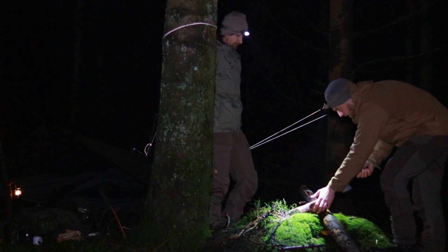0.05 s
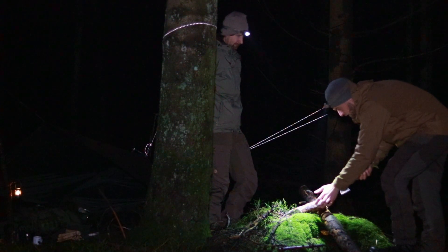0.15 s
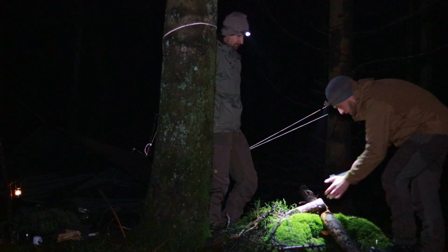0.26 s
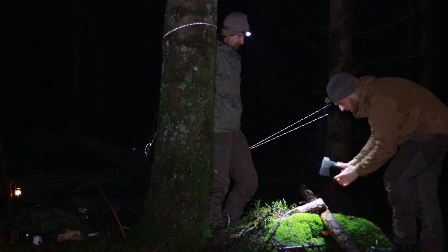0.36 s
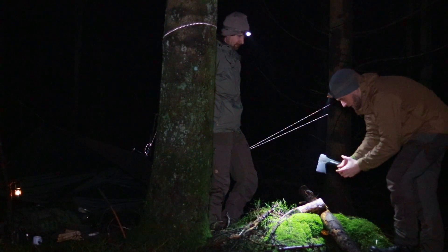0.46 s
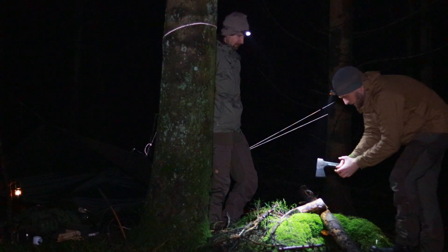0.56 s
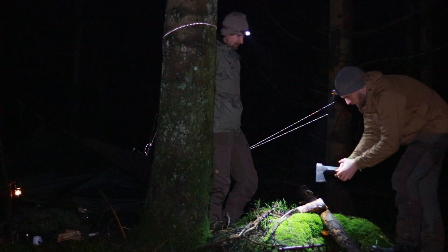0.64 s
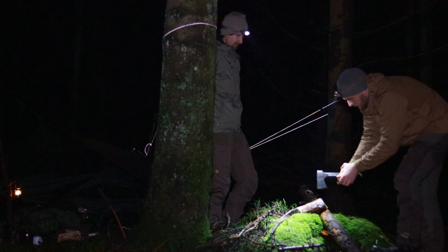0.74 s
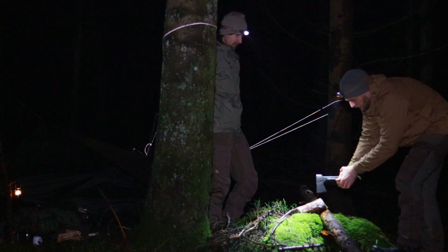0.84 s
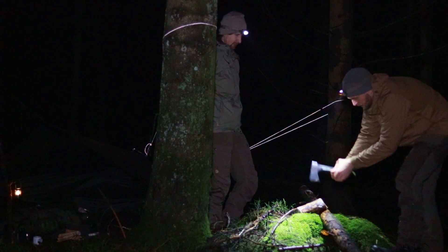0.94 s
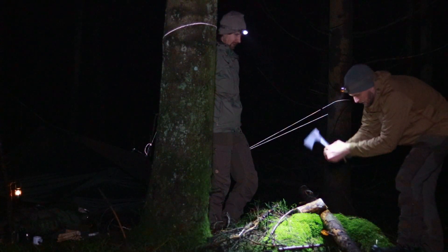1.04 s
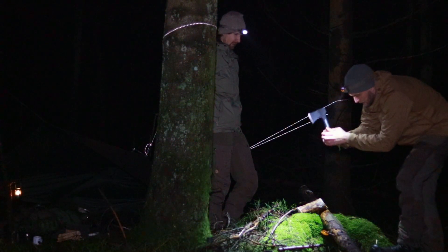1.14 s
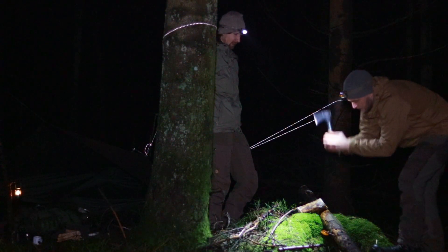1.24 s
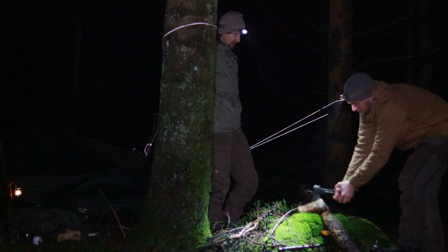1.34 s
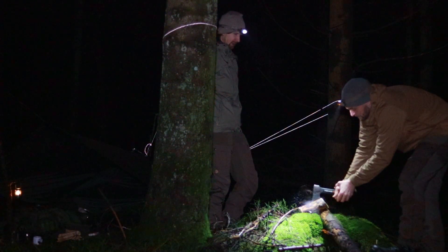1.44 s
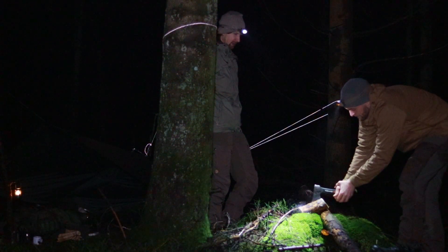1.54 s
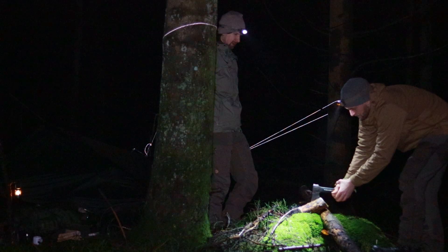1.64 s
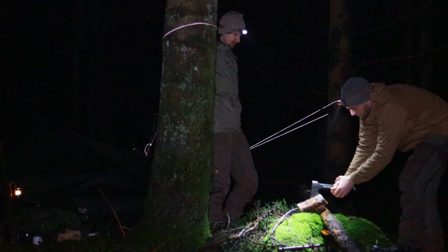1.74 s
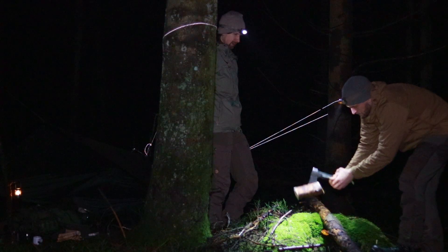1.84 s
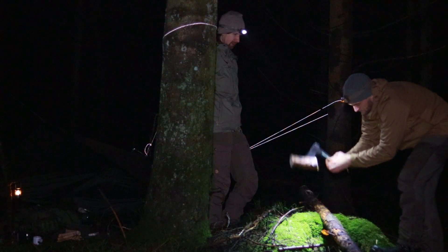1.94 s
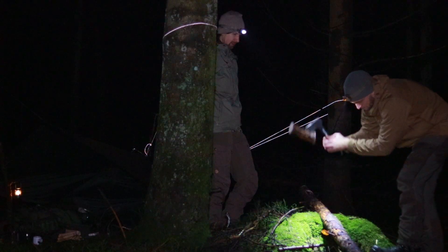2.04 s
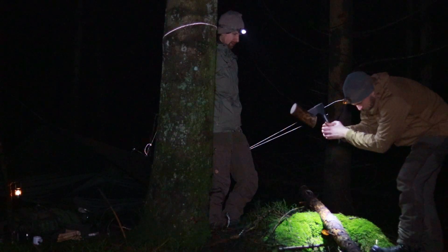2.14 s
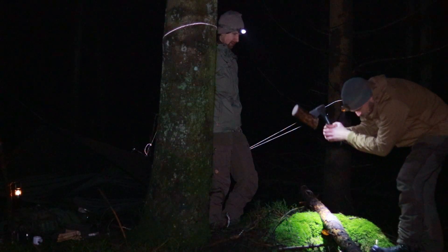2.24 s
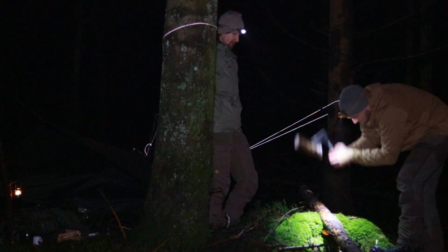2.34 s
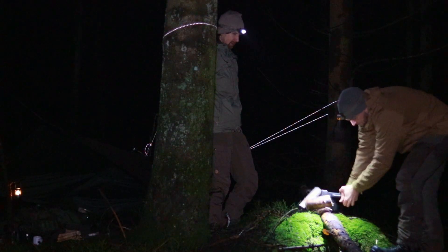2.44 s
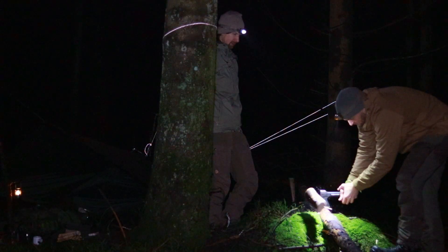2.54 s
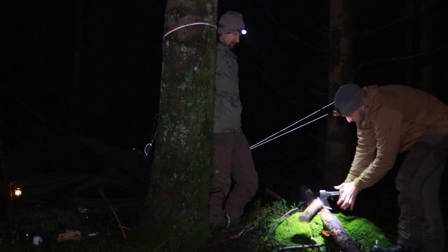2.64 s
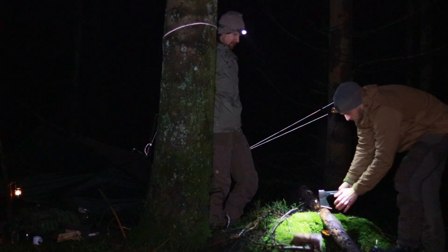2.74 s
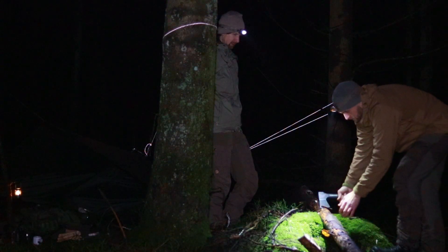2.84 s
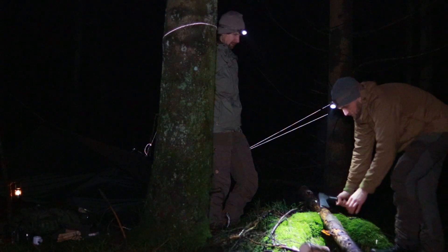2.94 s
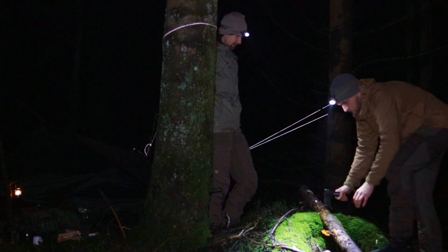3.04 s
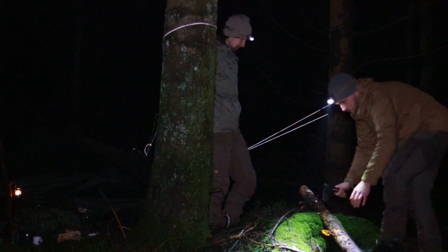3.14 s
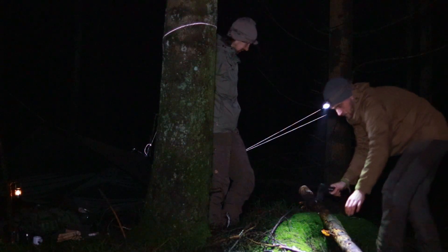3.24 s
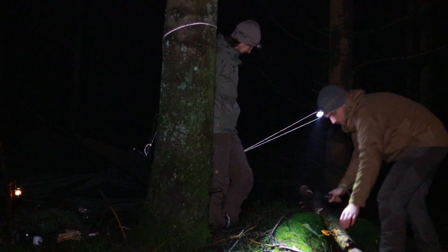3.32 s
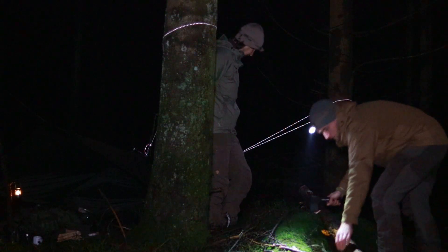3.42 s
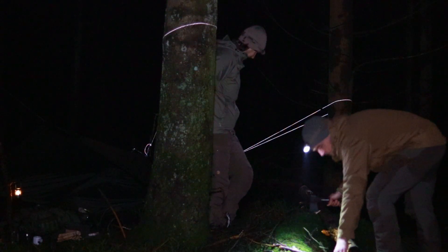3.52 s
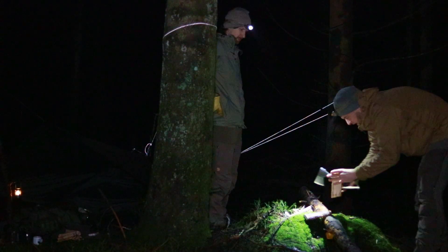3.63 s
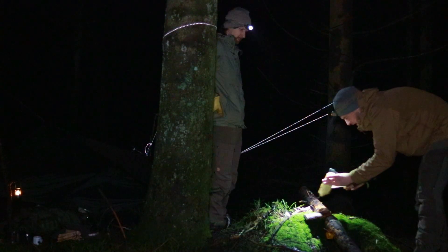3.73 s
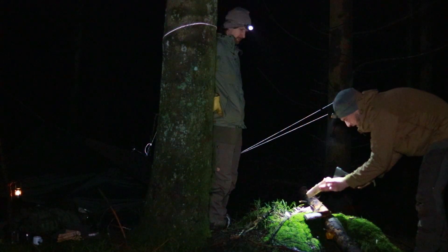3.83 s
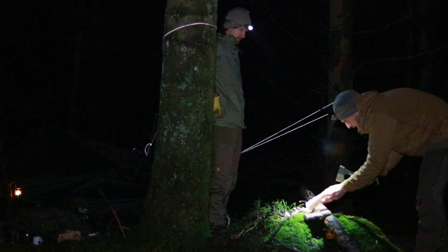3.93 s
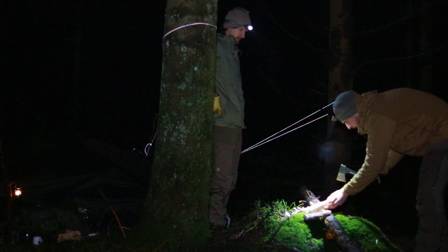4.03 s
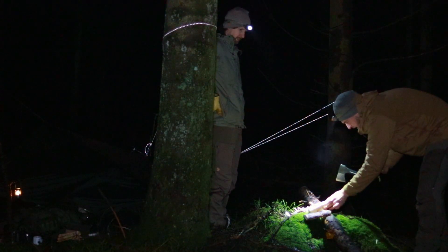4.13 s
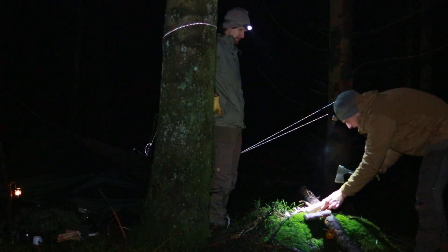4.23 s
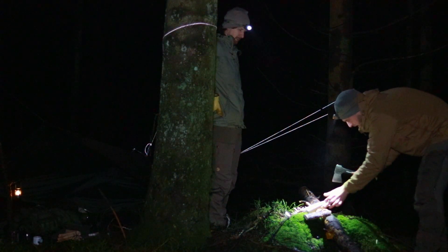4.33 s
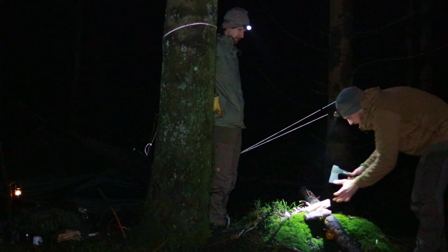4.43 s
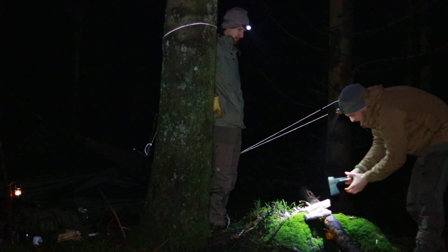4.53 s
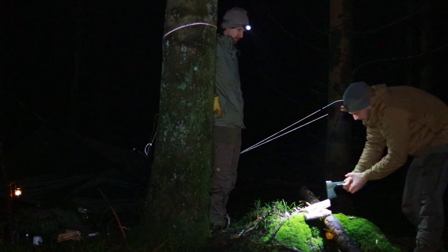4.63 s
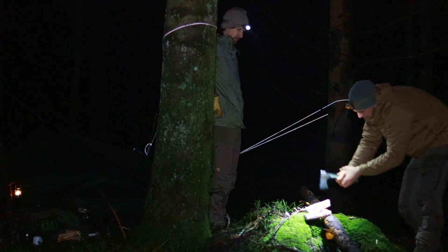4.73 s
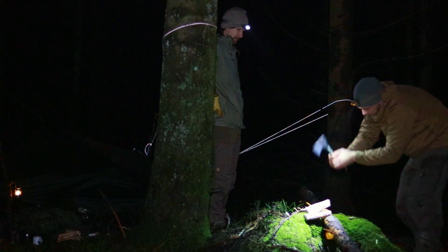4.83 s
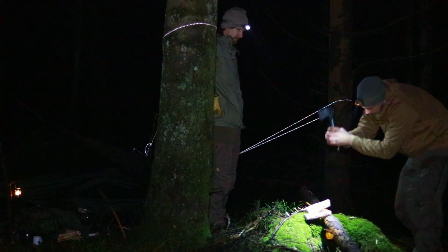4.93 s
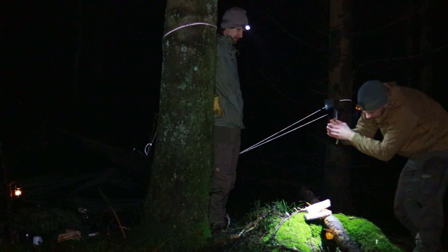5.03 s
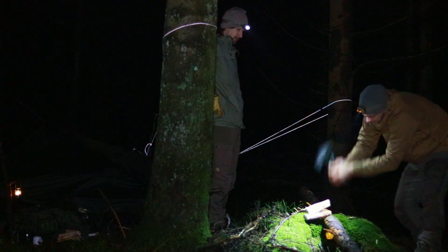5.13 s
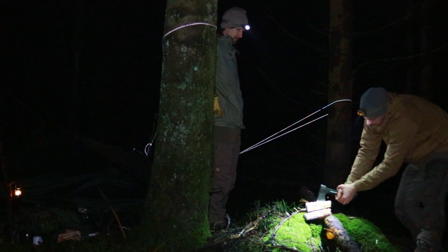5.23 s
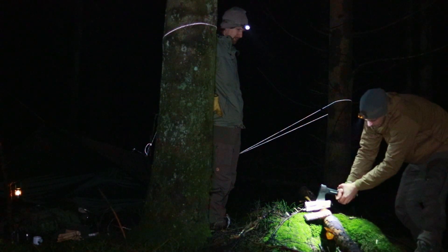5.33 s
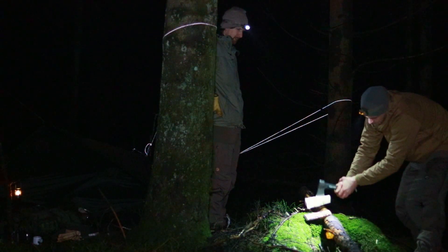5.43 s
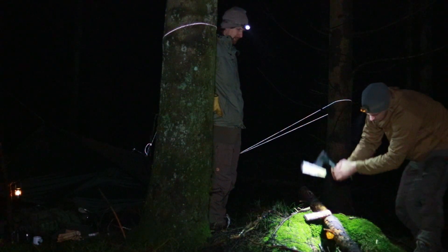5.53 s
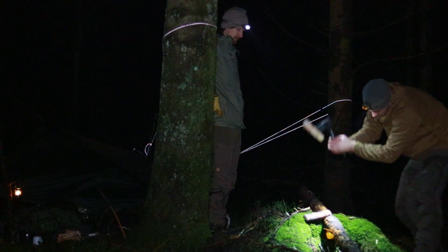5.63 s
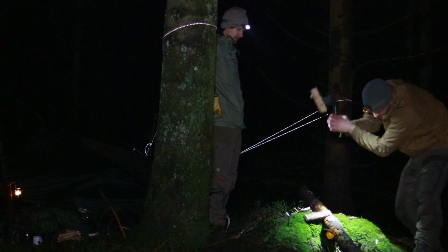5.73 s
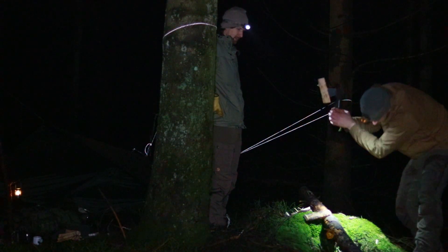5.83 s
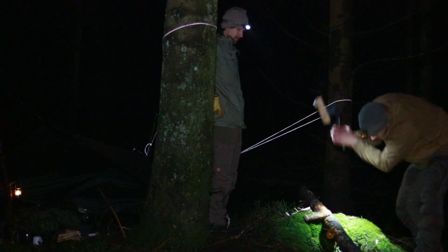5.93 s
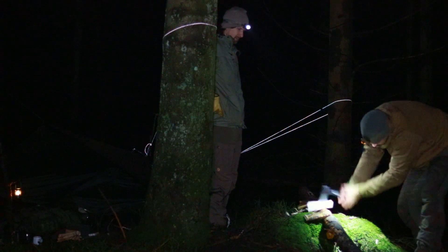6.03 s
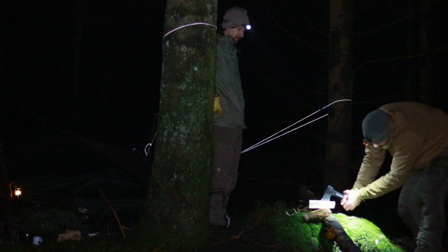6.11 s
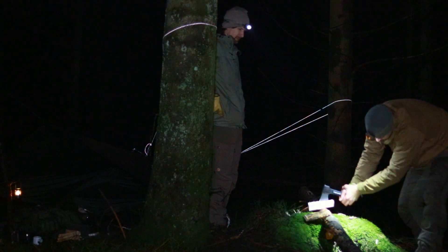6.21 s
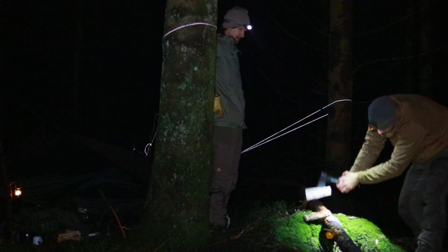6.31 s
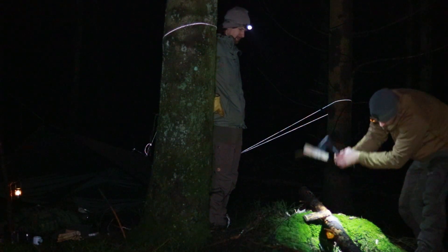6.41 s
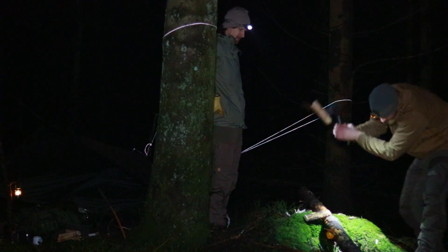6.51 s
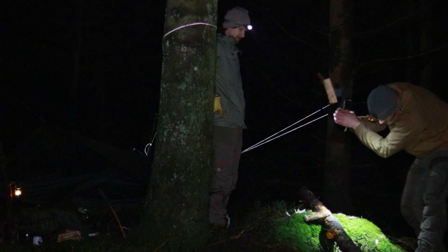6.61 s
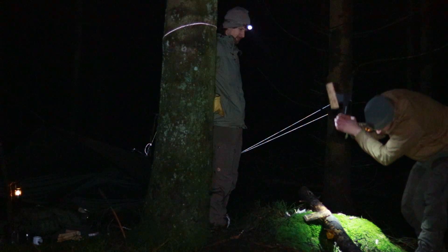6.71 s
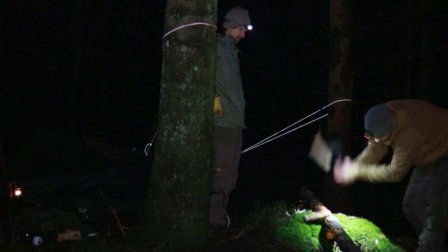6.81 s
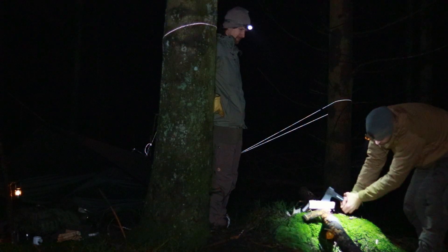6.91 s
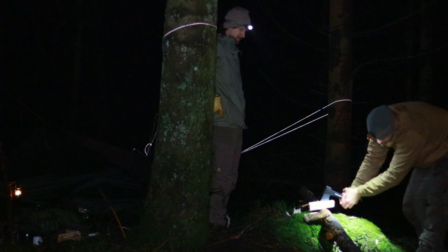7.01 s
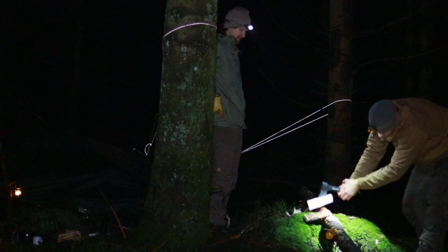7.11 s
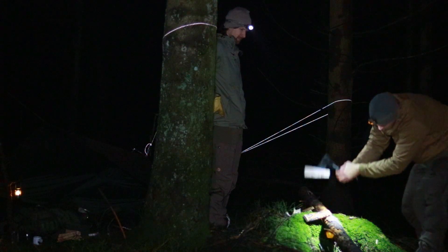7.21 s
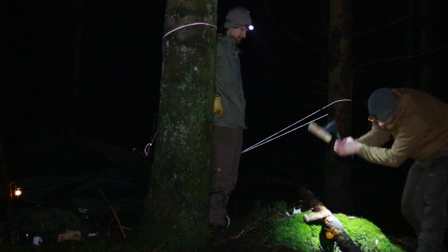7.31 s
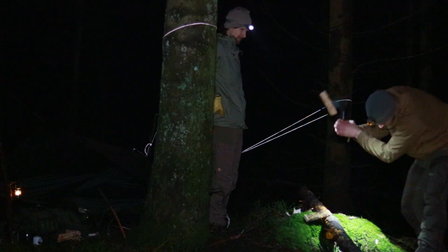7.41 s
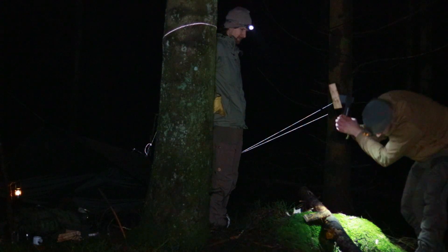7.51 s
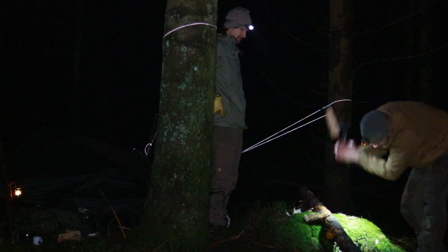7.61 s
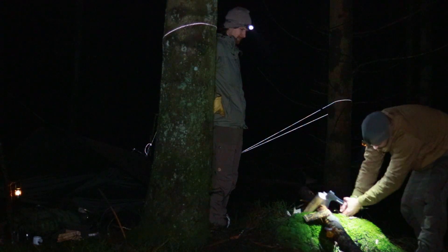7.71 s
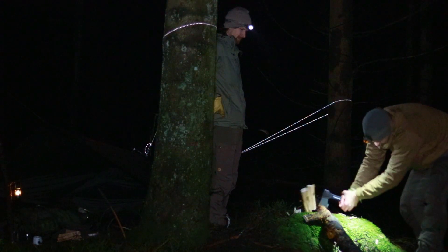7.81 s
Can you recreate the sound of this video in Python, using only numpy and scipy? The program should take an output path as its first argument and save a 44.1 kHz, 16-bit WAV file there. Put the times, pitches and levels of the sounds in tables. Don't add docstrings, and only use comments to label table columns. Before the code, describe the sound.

Close to the microphone in a quiet night forest, a hatchet bites a billet, then splits it with a sharp crack, tearing fibres and a thin ringing blade. Twigs snap and gloves rub as a half lands. Four more heavy blows follow on another billet, the first dull, the last cracking loudest. Trees answer each with a diffuse tail; far water and hiss lie below.

```python
import sys
import numpy as np
from scipy import signal
from scipy.fft import irfft
from scipy.io import wavfile

SR = 44100
rng = np.random.default_rng(int(sys.argv[2]) if len(sys.argv) > 2 else 0)


def ratio(d):
    e = np.asarray(d, float) / 20
    return 10 ** e


def transcribe(signal):
    frames = np.atleast_2d(signal).T
    limited = np.clip(frames, -1, 1)
    pcm = np.round(limited * 32767).astype(np.int16)
    wavfile.write(sys.argv[1], SR, pcm)


N = 346626

# start in seconds, level in dB.
BLADE_FREE = [
    (2.531, -23.5),
]


def rms_one(x):
    return x / np.sqrt(np.mean(x ** 2) + 1e-20)


def filtered(x, order, hz, kind):
    return signal.sosfilt(signal.butter(order, hz, kind, fs=SR, output="sos"), x)


def at_hz(points, hz, column=1):
    points = np.array(points)
    return np.interp(np.log(hz), np.log(points[:, 0]), points[:, column])


def clicks(times, gains):
    out = np.zeros(N)
    places = np.minimum((np.asarray(times) * SR).astype(int), N - 1)
    np.add.at(out, places, gains)
    return out


def ring(x, hz, t60):
    radius = ratio(-60 / (t60 * SR))
    turn = 2 * np.pi * hz / SR
    return signal.lfilter([0, np.sin(turn)], [1, -2 * radius * np.cos(turn), radius * radius], x + 1e-18)


def bands(size):
    edges_hz = 28 * 2 ** np.arange(0, 9.4, 1 / 3)
    white = rng.standard_normal((2, size))
    for k, (low, high) in enumerate(zip(edges_hz, edges_hz[1:])):
        yield np.sqrt(low * high), filtered(white[k % 2], 2, [low, high], "band")


def coloured(spectrum):
    return rms_one(sum(ratio(at_hz(spectrum, hz)) * band for hz, band in bands(N)))


def log_thump(times, thump_db, ring_db):
    # frequency in Hz, level in dB, t60 in seconds.
    thump_modes = [(246.3, -5.5, 0.067), (349.4, -3, 0.054), (478, -6.5, 0.041), (597.5, -2, 0.024),
                   (745.4, -6.5, 0.035), (905, -13, 0.037)]
    # frequency in Hz, level in dB, t60 in seconds.
    log_modes = [(149, -18.5, 0.33), (239, -1.5, 0.27), (334.4, 0.5, 0.22), (469.3, -12, 0.15),
                 (735, -10.5, 0.15)]
    wave_lag_s, lead_s = 0.00507, 0.0016
    out = np.zeros(N)
    for modes, level_db in ((thump_modes, thump_db), (log_modes, ring_db)):
        for hz, db, t60 in modes:
            lag = wave_lag_s * (np.sqrt(900 / hz) - 1) - lead_s
            out += ring(clicks(times + lag, ratio(level_db + db)), hz, t60)
    return filtered(out, 2, 1100, "low")


def struck(modes, times, level_db, spread_db):
    luck = rng.standard_normal((len(times), len(modes)))
    out = np.zeros(N)
    for k, (hz, db, t60) in enumerate(modes):
        gains = ratio(level_db + db + spread_db * luck[:, k]) * (-1) ** k
        out += ring(clicks(times, gains), hz, t60)
    return out


def billet_knock(billet, times, knock_db):
    direct = struck(billet, times, knock_db, spread_db=3.0)
    shorter = np.array(billet) * [1, 1, 0.57]
    spread = struck(shorter, times, knock_db - 0.5, spread_db=0.1)
    return np.array([direct, filtered(spread, 2, 910, "high")])


def fibre_crack(times, crack_db, t60):
    # frequency in Hz, level in dB per Hz.
    crack_colour = [(600, -13), (1500, -2), (3000, -1.5), (4500, -2.5), (7500, -9.5), (10500, -11),
                    (12500, -15), (15500, -22)]
    click_share = 0.45
    envelope, age = np.zeros(N + SR), np.arange(SR // 5) / SR
    for s, gain in zip(times - 0.0006, ratio(crack_db)):
        rise = 1 - np.exp(-age / 0.00012)
        envelope[int(s * SR):][:len(age)] += gain * rise * ratio(-60 * age / t60)
    burst = coloured(crack_colour) * envelope[:N]
    energy = clicks(times, ratio(crack_db) * np.sqrt(t60 * SR / np.log(1e6)))
    colour = ratio(at_hz(crack_colour, np.arange(1, 259) * SR / 514))
    pulse = irfft(rms_one(colour) * (-1) ** np.arange(258))
    click = np.convolve(energy, pulse)[257:][:N]
    return np.array([click_share * click + (1.3 - click_share) * burst, click])


def airborne(blows, billet, crack_t60):
    s, _, _, knock_db, crack_db = np.transpose(blows)
    s = s + 0.0068
    return billet_knock(billet, s, knock_db) + fibre_crack(s, crack_db, crack_t60)


def blade():
    # frequency in Hz, level in dB, t60 in seconds, width in Hz.
    blade_modes = [(1874, -7, 1.35, 20), (2200, -13.5, 2.5, 180), (4310, -10, 1.54, 110),
                   (7480, -14.5, .45, 400)]
    out, age = np.zeros(N + 2 * SR), np.arange(2 * SR) / SR
    for s, level_db in BLADE_FREE:
        for hz, db, t60, width_hz in blade_modes:
            band = rng.standard_normal(3 * SR)
            for _ in range(2):
                band = ring(band, hz, 0.79 / width_hz)
            fade = ratio(level_db + db - 3.5 - 60 * age / t60)
            out[int(s * SR):][:2 * SR] += fade * rms_one(band[SR:])
    return out[:N]


def tearing():
    peak_s, rise_s, fall_s = 2.70, 0.08, 0.15
    clicks_per_s = 700
    t = np.arange(N) / SR
    swell = np.exp(np.where(t < peak_s, (t - peak_s) / rise_s, (peak_s - t) / fall_s))
    level = ratio(-39) * swell * (t > BLADE_FREE[0][0])
    strength = ratio(2.8 * rng.exponential(1, N)) * rng.choice([-1, 1], N)
    grains = (rng.random(N) < clicks_per_s / SR) * strength
    return level * rms_one(filtered(grains + 1e-18, 2, (1880, 3100), "band"))


def ticks(rows, t60, cycles):
    grit_level, wide_level = 0.7, 0.16
    size = 2000
    fade = ratio(-60 * np.arange(size) / SR / t60)
    click = np.sqrt(t60 * SR / 20) * (np.arange(size) == 0)
    out = np.zeros(N + SR)
    for (s, db, hz), grit in zip(rows, rng.standard_normal((len(rows), size))):
        burst = grit_level * grit * fade + click
        snap = rms_one(ring(burst, hz, cycles / hz)) + wide_level * rms_one(np.diff(burst, prepend=0))
        out[int(s * SR):][:size] += ratio(db) * snap / np.abs(snap).max()
    return out[:N]


def small_snaps():
    # start in seconds,
    # peak in dB, pitch in Hz.
    splinters = [(1.4455, -8.5, 4400), (1.5783, -22, 3750), (1.4435, -8.5, 8000), (2.5249, -16, 2500),
                 (2.546, -7, 7500), (2.6638, -44, 4200), (2.680, -19, 2700), (2.8572, -27.5, 1150),
                 (2.8758, -8, 11900), (2.876, -19.5, 7450), (2.877, -25, 4700), (2.891, -21.5, 4600),
                 (6.1458, -10, 3460), (6.1908, -28, 4500), (7.802, -7, 2200)]
    # start in seconds, peak in dB, pitch in Hz.
    twigs = [(.300, -43, 905), (3.1986, -24, 8500), (3.3064, -44, 9000), (3.3735, -25.5, 5940),
             (3.3735, -29, 1190), (3.3905, -29, 2200), (3.4505, -25, 7100), (3.4558, -8.5, 8200),
             (3.4558, -24, 3220), (3.75, -36, 1220), (4.1599, -33.5, 4200)]
    # start in seconds, peak in dB, pitch in Hz.
    rubs = [(.482, -35, 6500), (3.4371, -33, 6000), (3.62, -43, 12200), (3.6895, -32, 3200),
            (3.70, -33, 7000), (3.725, -36, 7500), (3.7349, -31.5, 5950), (5.4715, -35, 5000),
            (5.475, -32.5, 8500)]
    return ticks(splinters, 0.0092, cycles=19.0) + ticks(twigs, 0.0062, cycles=3.7) + ticks(rubs, 0.048, cycles=4.7)


def swish():
    # loudest moment in seconds, level in dB, swing in seconds.
    swings = [
        (1.3, -61, 0.24),
        (5.2, -50, 0.095),
    ]
    fall_s = 0.023
    t = np.arange(N) / SR
    level = np.zeros(N)
    for s, db, swing_s in swings:
        level += ratio(db) * np.exp(np.where(t < s, (t - s) / swing_s, -((t - s) / fall_s) ** 2))
    return level * coloured([(800, 0), (3000, 7), (8000, 1), (14000, -28)])


def near_echoes(x):
    dull = signal.lfilter([0.6], [1, -0.4], x)
    ground = np.roll(dull, int(0.004 * SR)) * ratio(-10)
    trunk = np.roll(dull, int(0.0152 * SR)) * ratio(-17)
    return x + ground + trunk


def forest(x):
    # frequency in Hz, level in dB, t60 in seconds.
    scatter = [(200, -25, 0.35), (503, -28.5, 2.3), (1050, -33.5, 1.37), (2200, -38, 1.4),
               (4500, -35.5, 1.19), (9000, -33, 0.63), (15000, -46, 0.41)]
    age = np.arange(int(1.6 * SR)) / SR
    swell = (1.13 + np.clip(age / 0.13, 0, 1)) * np.clip(age / 0.008, 0, 1)
    answer = np.zeros(len(age))
    for hz, band in bands(len(age)):
        t60 = at_hz(scatter, hz, column=2)
        answer += ratio(at_hz(scatter, hz) - 60 * age / t60) * band
    return signal.fftconvolve(x, answer * swell * ratio(-14.5))[:N]


def water_and_hiss():
    # frequency in Hz, level in dB per Hz.
    water_colour = [(30, -13), (60, -3.5), (120, -14.5), (330, 0), (900, -2.5), (1300, -8.5), (3000, -22.5),
                    (9000, -49)]
    # time in seconds, level in dB.
    water_level = [(0, -51.5), (2.4, -51.5), (3.5, -49), (5, -49), (7.86, -46.5)]
    # frequency in Hz, level in dB per Hz.
    hiss_colour = [(30, -17), (1000, -8), (3000, 0), (6000, -1.5), (10000, -3), (13000, -4), (16000, -3.5)]
    fader = ratio(np.interp(np.arange(N) / SR, *np.transpose(water_level)))
    return fader * coloured(water_colour) + ratio(-59.5) * coloured(hiss_colour)


def scene():
    # start in seconds, then log thump, log ring, billet knock and crack in dB.
    first_blows = [
        (1.4390, -2, -18.5, -16.5, -7.5),
        (2.5239, -1, -15, -8.5, -5),
    ]
    second_blows = [
        (5.2693, 1.2, -13.5, -9, -18),
        (6.138, 3.2, -18.5, -5.5, -6),
        (6.9609, 2.2, -15, -8, -8.5),
        (7.7937, 2.7, -16, -10, -3),
    ]
    # start in seconds, log thump in dB, log ring in dB.
    drops = [
        (3.4495, -29.5, -35.5),
        (1.575, -37, -50),
        (5.36, -36, -34.5),
    ]
    # frequency in Hz, level in dB, t60 in seconds.
    first_modes = [(655, -3.5, 0.0099), (1190, -0.5, 0.007), (2010, -5, 0.028), (2280, 4.5, 0.0066),
                   (2770, -4, 0.0059), (4100, -4, 0.011)]
    second_modes = [(790, -2.5, 0.022), (1042, 7.5, 0.014), (1263, 4.5, 0.016), (1425, -1.5, 0.025),
                    (1950, 1.5, 0.0052), (3900, -4.5, 0.0031)]
    hits = np.vstack([np.array(first_blows)[:, :3], np.array(second_blows)[:, :3], drops])
    first = airborne(first_blows, first_modes, crack_t60=0.025)
    second = airborne(second_blows, second_modes, crack_t60=0.017)
    direct, spread = first + second
    small = small_snaps()
    tail = forest(spread + ratio(-7) * small)
    air = near_echoes(direct) + small + tail + blade() + tearing()
    return (log_thump(*hits.T) + air + swish() + water_and_hiss())[None]


def band_limit(x):
    return signal.sosfilt(signal.butter(12, 15770, fs=SR, output="sos"), x)


def record(dry):
    heard = filtered(dry, 2, 126.4, "high")
    return band_limit(np.clip(heard, -1, 1))


dry = scene()
out = record(dry)
transcribe(out)
```